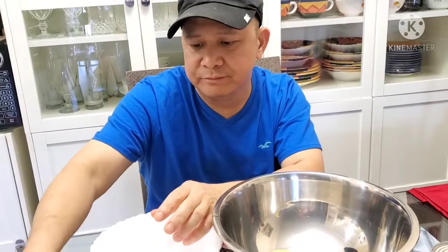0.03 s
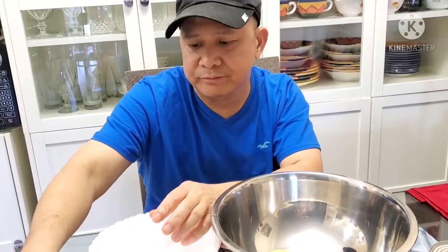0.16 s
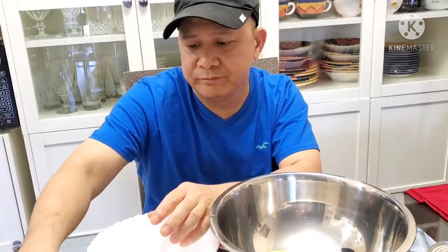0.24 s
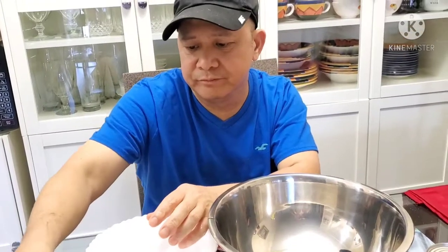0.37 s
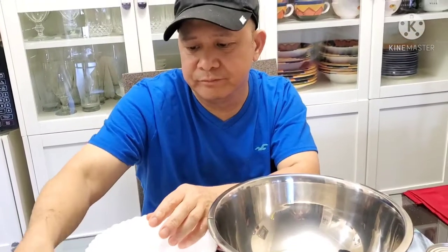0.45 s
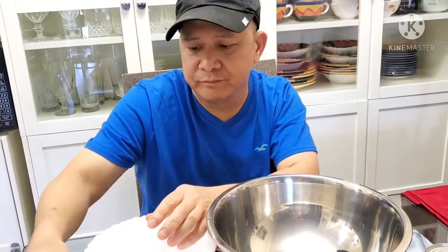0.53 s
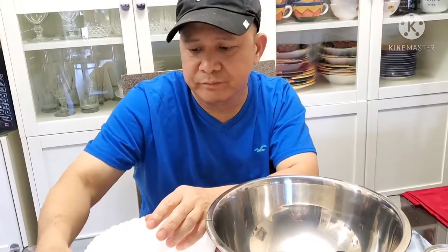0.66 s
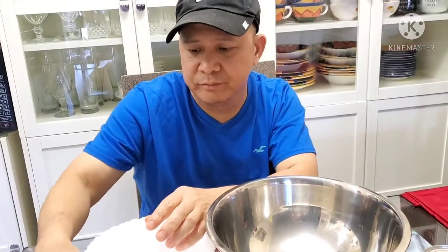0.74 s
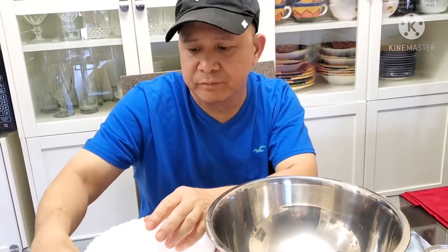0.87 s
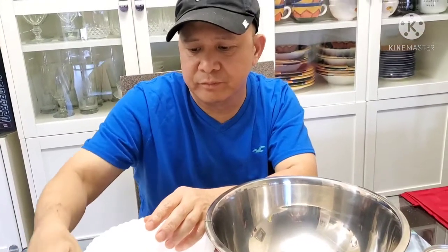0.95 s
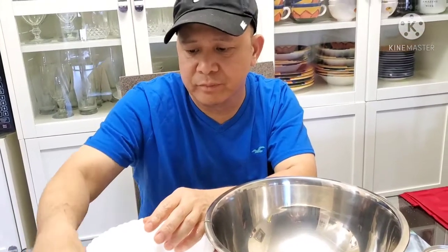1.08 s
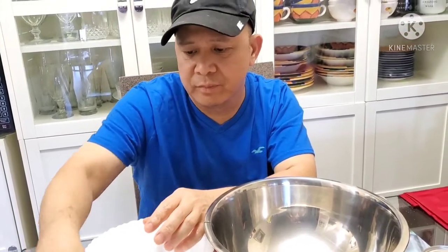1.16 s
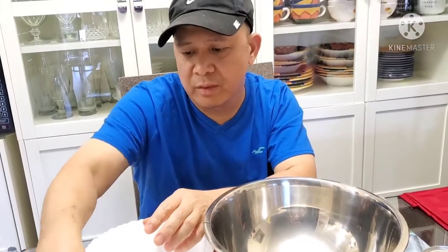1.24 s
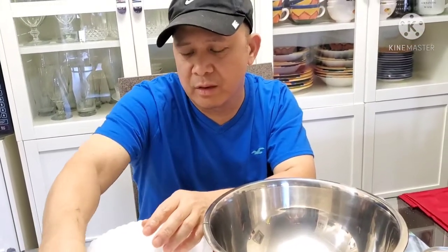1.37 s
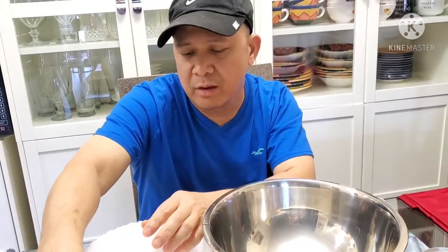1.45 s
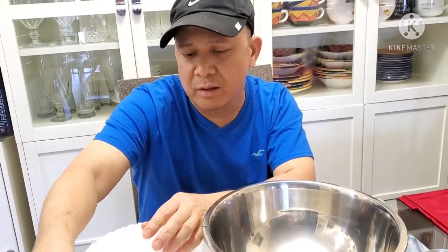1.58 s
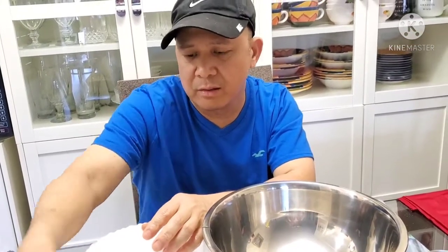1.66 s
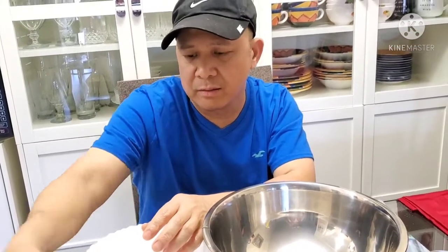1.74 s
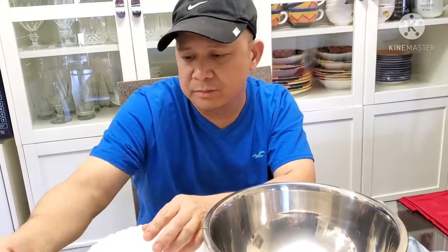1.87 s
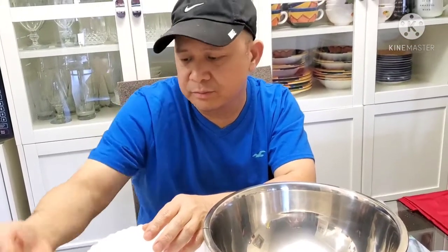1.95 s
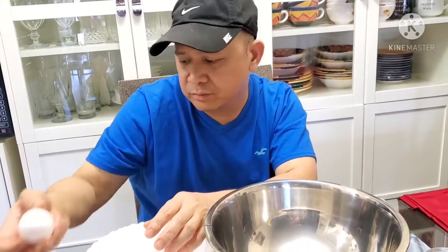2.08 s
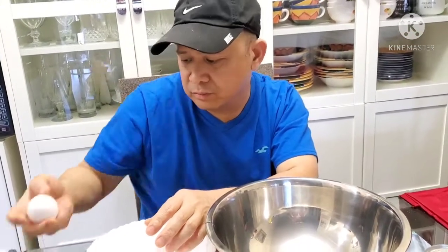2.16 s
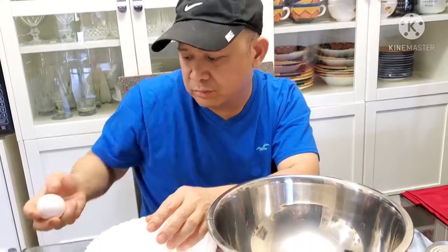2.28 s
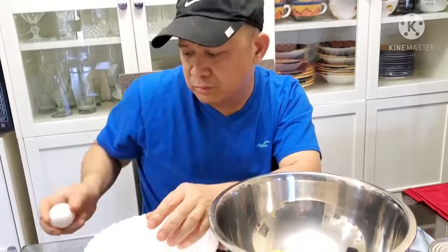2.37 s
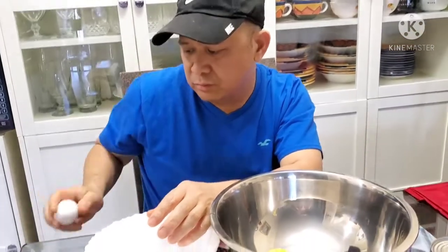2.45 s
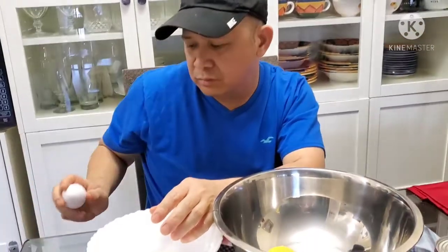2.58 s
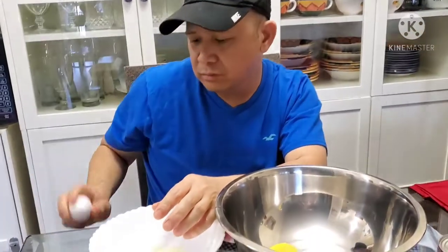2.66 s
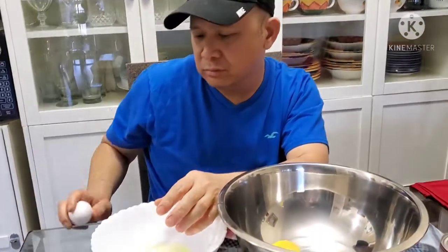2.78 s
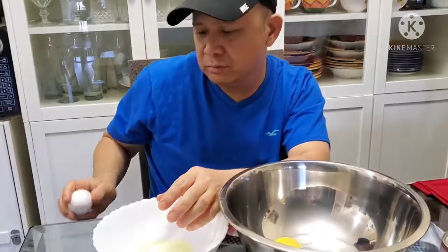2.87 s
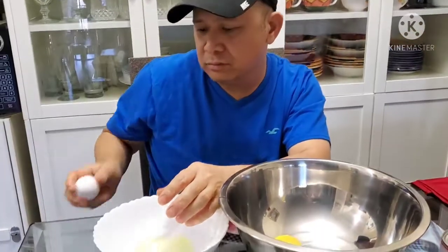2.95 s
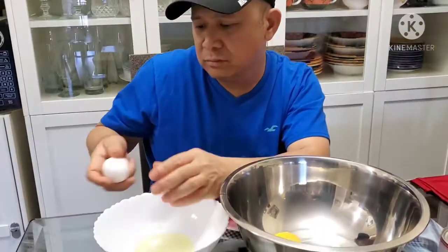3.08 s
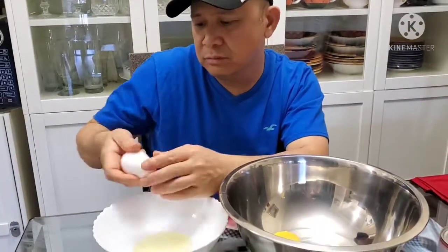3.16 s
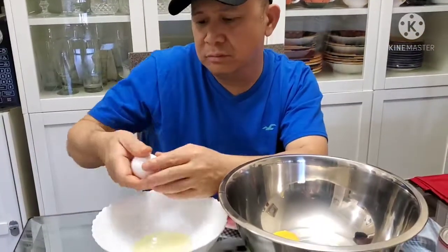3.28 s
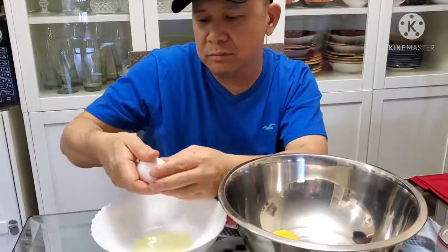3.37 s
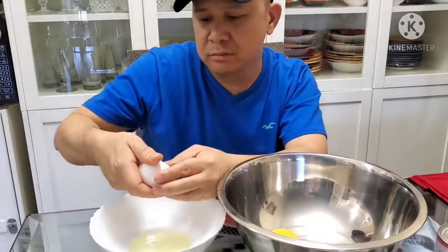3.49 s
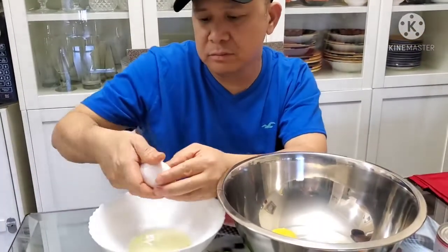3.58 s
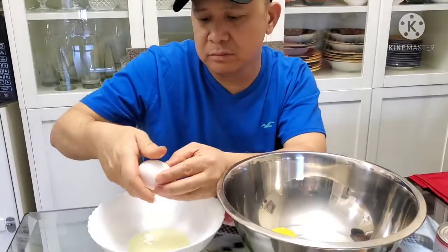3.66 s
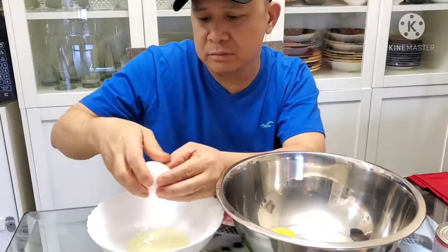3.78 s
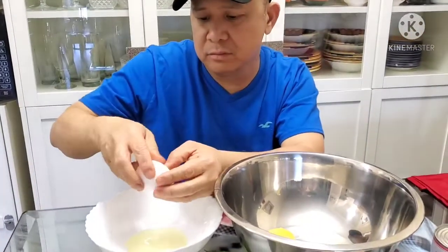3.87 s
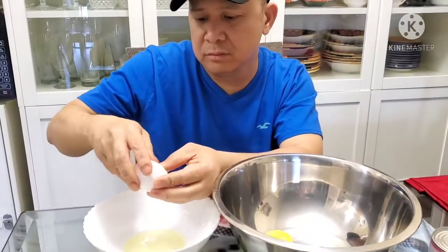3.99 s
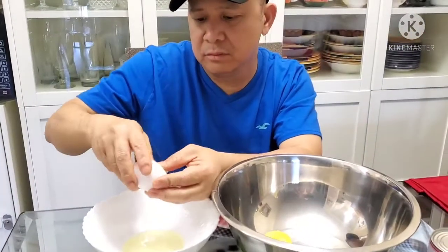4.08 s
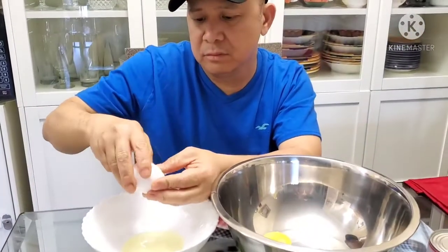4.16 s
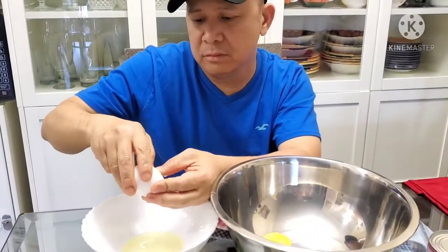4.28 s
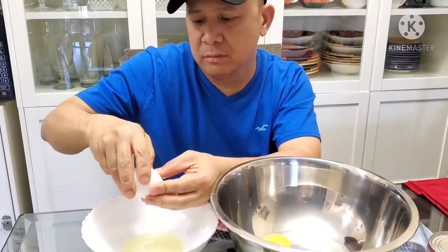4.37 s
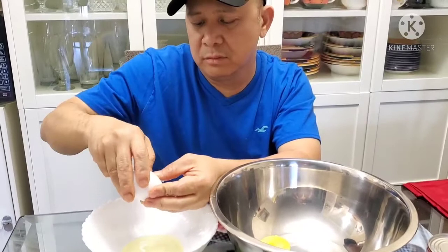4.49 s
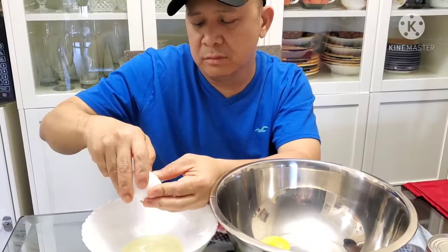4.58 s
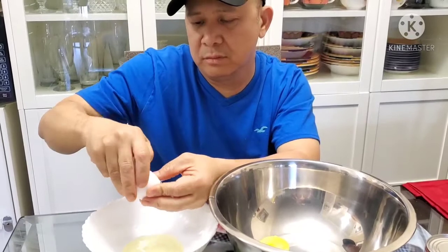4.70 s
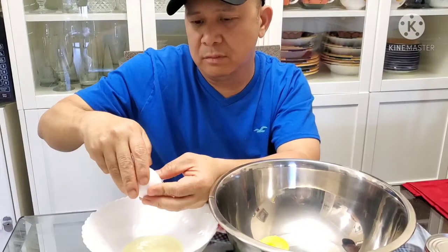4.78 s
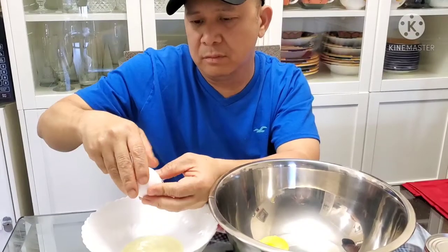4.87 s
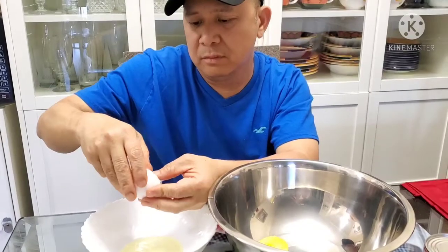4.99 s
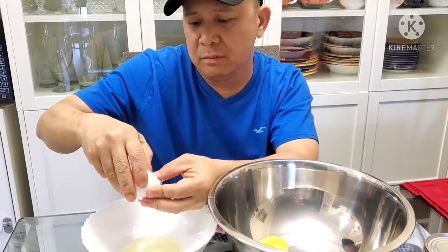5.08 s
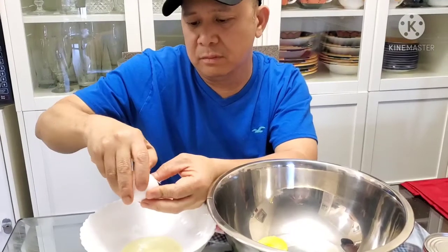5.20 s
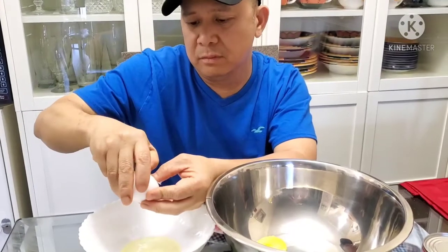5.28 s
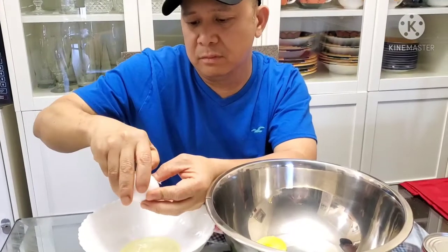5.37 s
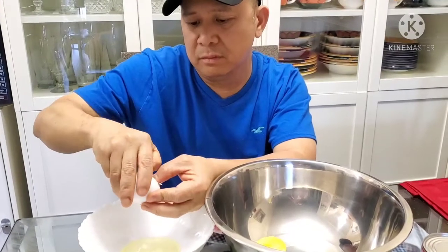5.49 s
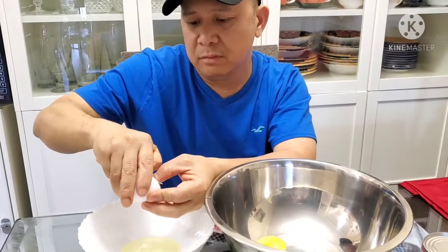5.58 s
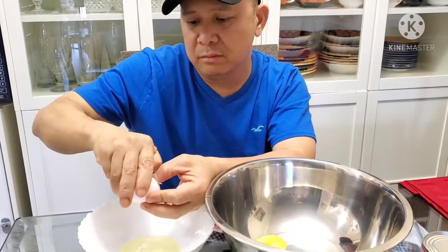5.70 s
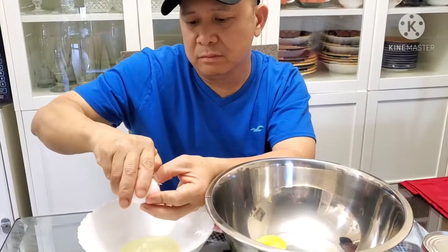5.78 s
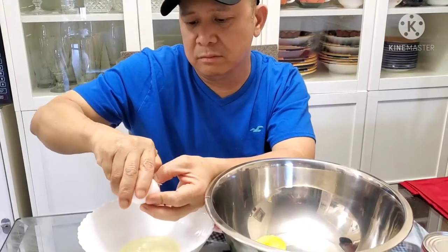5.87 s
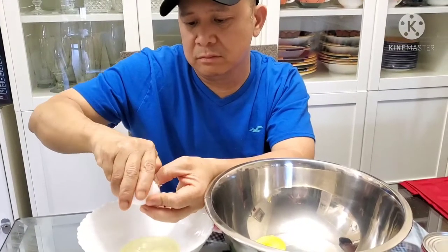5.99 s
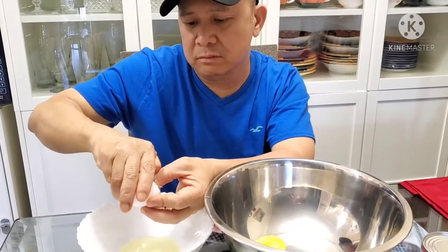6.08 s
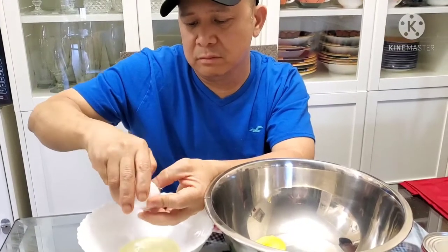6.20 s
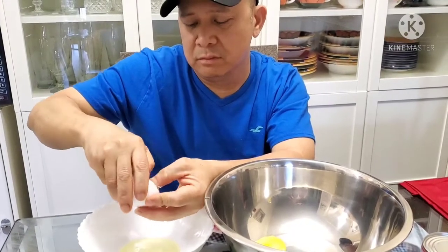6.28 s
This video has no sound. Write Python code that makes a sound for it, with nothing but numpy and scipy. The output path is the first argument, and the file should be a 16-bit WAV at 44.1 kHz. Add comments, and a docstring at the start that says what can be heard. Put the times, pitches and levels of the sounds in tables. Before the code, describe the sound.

Close handheld stereo capture in a reverberant kitchen: hollow papery rummaging and small taps come first, over a low fading engine drone and faint fridge hum. A single hard egg blow against a bowl dominates midway, ringing shortly in the room. Later the shell crackles crisply, a woody knock lands, and a weaker one closes. Birds chirp outside throughout, echoing through a window.

```python
"""A vehicle drones away outside and a fridge hums; a hand rummages in an egg carton while birds chirp.
The egg is knocked open on a bowl's edge, the shell crackles and two duller knocks follow on the table.
Drone, hum and birds are sines with shaken pitch; rubbing, road and air are shaped noise.
Blows are short cracks plus decaying modes. A hard-walled kitchen answers all but background and hiss.
Heard by a phone's two microphones."""
import sys
import numpy as np
from scipy import signal
from scipy.fft import rfft, irfft, next_fast_len
from scipy.io import wavfile
from scipy.ndimage import uniform_filter1d, map_coordinates

SR = 44100
rng = np.random.default_rng(int(sys.argv[2]) if len(sys.argv) > 2 else 0)


def output_pcm(signal):
    """Save a mono or channel-first signal as 16-bit PCM at the path in sys.argv[1].

    Samples are clipped to [-1, 1] before scaling.
    """
    pcm = np.clip(np.atleast_2d(signal).T, -1, 1) * 32767
    wavfile.write(sys.argv[1], SR, np.round(pcm).astype(np.int16))


N = 279594


def amp(db):
    """Gain of a level in dB."""
    return 10 ** (np.asarray(db) / 20)


def pan(db):
    """Left and right gains whose levels differ by db."""
    return amp(np.array([[.5], [-.5]]) * db)


def unit(x):
    """x at rms 1."""
    return x / np.sqrt(np.mean(x ** 2) + 1e-20)


def along(points, hz):
    """Interpolates (frequency [Hz], value) points on a log frequency axis."""
    f, v = np.transpose(points)
    return np.interp(np.log(hz + 1), np.log(f + 1), v)


def curves(rows):
    """One value per sample for each column after the time."""
    s, *cols = np.transpose(rows)
    return [np.interp(np.arange(N) / SR, s, c) for c in cols]


def wobble(rate_hz):
    """A smooth random curve with rate_hz knots a second."""
    knots = rng.standard_normal(int(N * rate_hz / SR) + 4)
    return map_coordinates(knots, [np.arange(N) * rate_hz / SR])


def filtered(x, response):
    """x shaped by a gain response of frequency, zero phase."""
    m = next_fast_len(x.shape[-1] + 8192)
    spectrum = rfft(x, m) * response(np.fft.rfftfreq(m, 1 / SR))
    return irfft(spectrum, m)[..., :x.shape[-1]]


def causal(points, size=4096):
    """Minimum-phase pulse of unit energy: the given spectrum, packed after its start."""
    hz = np.fft.rfftfreq(size, 1 / SR)
    cepstrum = irfft(np.log(amp(along(points, hz)) + 1e-6))
    cepstrum[1:size // 2] *= 2
    cepstrum[size // 2 + 1:] = 0
    pulse = irfft(np.exp(rfft(cepstrum)))
    return pulse / np.linalg.norm(pulse)


# left-right correlation of diffuse sound: (frequency [Hz], correlation [-1..1])
LIKENESS = [(60, 0.9), (130, 0.81), (290, .85), (640, .5), (1400, 0.024), (15000, .03)]


def rush(spectrum):
    """Stereo noise of rms 1, alike in the bass and unrelated in the treble."""
    def turn(hz):
        return np.arccos(np.clip(along(LIKENESS, hz), -1, 1)) / 2

    def mid_side(hz):
        return amp(along(spectrum, hz)) * [np.cos(turn(hz)), np.sin(turn(hz))]

    mid, side = filtered(rng.standard_normal((2, N)), mid_side)
    return unit(np.array([mid + side, mid - side]))


def add(out, x, s):
    """Mixes x into out from time s."""
    part = out[:, max(round(s * SR), 0):][:, :x.shape[1]]
    part += x[:, :part.shape[1]]


# reverberation of the hard-walled room: (frequency [Hz], t60 [s])
ROOM_T60 = [(100, 0.43), (500, .52), (1500, 0.55), (4000, 0.49), (10000, 0.56), (16000, 0.3)]


def kitchen(x, direct_db, early_db, early_t60):
    """Direct sound, a quick cluster of near reflections and a tail that decays per frequency."""
    size = SR * 4 // 7
    hz, t, z = signal.stft(rng.standard_normal((2, size)), SR, nperseg=256)
    decay = amp(-60 * t / along(ROOM_T60, hz)[:, None])
    tail = signal.istft(z * decay, SR, nperseg=256)[1][:, :size]
    t = np.arange(size) / SR
    early = amp(early_db - 60 * t / early_t60) * rng.standard_normal((2, size))
    mid, side = (tail + early) * (1 - np.exp(-t / 0.0021))

    def likeness(hz):
        return np.clip(along(LIKENESS, hz), -1, 1)

    mid = filtered(mid, lambda hz: np.sqrt(1 + likeness(hz)))
    side = filtered(side, lambda hz: np.sqrt(1 - likeness(hz)))
    answer = np.array([mid + side, mid - side])
    answer /= np.linalg.norm(answer[0])
    answer[:, 0] += amp(direct_db)
    return signal.fftconvolve(np.atleast_2d(x), answer, axes=1)


def blows(events, colour, modes, ring_db, direct_db, early_db, early_t60):
    """Each blow is one crack in the room, plus the decaying modes of the thing struck."""
    out, t = np.zeros((2, N)), np.arange(SR * 4 // 7) / SR
    onset = 1 - np.exp(-t / 0.0026)
    for s, db, pan_db in events:
        sound = kitchen(causal(colour), direct_db, early_db, early_t60)[:, :len(t)]
        for hz, level_db, t60 in modes:
            # phases differ between the sides where the sound is less alike
            spread = (1 - along(LIKENESS, hz)) * rng.normal(0, 1.2, (2, 1))
            phase = rng.uniform(0, 2 * np.pi) + spread
            ring = amp(ring_db + level_db - 60 * t / t60) * onset
            sound += ring * np.sin(2 * np.pi * hz * t + phase)
        add(out, amp(db) * pan(pan_db) * sound, s)
    return out


# vehicle drawing away, low tone fading in and out: (time [s], firing tone [Hz], mean level [dB])
DRONE = [(0, 53.34, -44.5), (.45, 52.63, -49.5), (.95, 53.28, -41.5), (1.45, 53.67, -44.5),
         (1.92, 54.23, -49.5), (2.21, 54.38, -56.5), (2.52, 55.3, -50), (2.75, 58.7, -51.5),
         (2.95, 58.47, -64.5), (3.11, 55.2, -53), (3.25, 52.14, -75.5), (3.45, 52.3, -56.5),
         (4.06, 50.5, -80.5), (4.4, 46.63, -61), (5.0, 49.94, -71), (5.6, 55, -76), (5.85, 55, -61.5),
         (6.04, 64, -79), (6.25, 61.2, -65)]
# firing tone and neighbours: (multiple of firing tone, relative level [dB])
ORDERS = [(.75, -21), (0.999, -0.5), (1.252, -19.5), (2.001, -24)]


def vehicle_drone():
    """An engine's firing tone and weak neighbours, wavering in pitch and level."""
    hz, level_db = curves(DRONE)
    turns = 2 * np.pi * np.cumsum(hz + 0.8 * wobble(8.6)) / SR
    level = np.sqrt(2) * amp(level_db + 2.2 * wobble(2.7))
    return level * sum(amp(db) * np.sin(k * turns) for k, db in ORDERS)


# fridge tones: (frequency [Hz], mean level [dB])
HUM = [(120, -70), (195, -80.5)]


def fridge_hum():
    """Sines, each wavering slightly in pitch and more in level."""
    hum = 0
    for hz, db in HUM:
        level = np.sqrt(2) * amp(db + 3.8 * wobble(5))
        hum = hum + level * np.sin(2 * np.pi * np.cumsum(hz + .4 * wobble(6)) / SR)
    return hum


# road rumble: (time [s], level [dB])
ROAD_LEVEL = [(0, -56), (.5, -60.5), (1, -57.5), (2.2, -62), (2.75, -61), (3.2, -66.5), (4.3, -62.5),
              (5.3, -63.5), (6.34, -62.5)]
# road rumble spectrum: (frequency [Hz], relative level [dB])
ROAD_COLOUR = [(15, -41.5), (25, -14), (38, -13), (59, -2), (72, -2.5), (82, -15.5), (123, -8.5),
               (143, -13.5), (266, -14), (388, -22), (648, -20.5), (706, -25), (1500, -50), (1950, -76.5),
               (3300, -120)]


def road_rumble():
    """Low noise whose level follows the traffic and flutters slightly."""
    level_db, = curves(ROAD_LEVEL)
    return amp(level_db + 0.19 * wobble(27)) * rush(ROAD_COLOUR)


# still air spectrum: (frequency [Hz], relative level [dB])
AIR_COLOUR = [(600, -28.5), (1000, -3), (1600, -4.5), (2800, -7), (4000, -9), (7000, -19.5), (10000, -11),
              (13000, -11.5), (16000, -16)]
AIR_DB = -81.5


def background():
    """Drone, hum and rumble lean to the right in level; still air is an even noise floor."""
    tones = vehicle_drone() + fridge_hum()
    return (tones + road_rumble()) * pan(-2.2) + amp(AIR_DB) * rush(AIR_COLOUR)


# ticks of shell and carton, and the sharp onset of the first table knock:
# (time [s], strength [dB], left-right [dB])
TICKS = [(0.0272, -56, 5), (0.0603, -53, 12), (0.3381, -62, -1.5), (0.5993, -63, 7), (0.6264, -47, -1.5),
         (1.1381, -67, 3), (1.659, -59, 7), (2.1146, -67, -4), (3.7272, -64, 1.5), (4.6339, -43, -7),
         (4.691, -37.5, -6), (4.6991, -44, 4), (4.807, -40, -1), (5.1696, -66, -3.5), (5.7697, -65.5, -4),
         (5.8442, -65.5, -8)]
# tick spectrum: (frequency [Hz], relative level [dB])
TICK_COLOUR = [(700, -43), (1500, -32), (4000, -18), (7000, -10.5), (10000, 0.5), (14000, -4.5),
               (16500, -9.5)]


def ticks():
    """Tiny decaying noise snaps, answered mostly by near reflections."""
    out, t = np.zeros((2, N)), np.arange(SR // 50) / SR
    for s, db, pan_db in TICKS:
        grain = rng.standard_normal(len(t)) * amp(-60 * t / 0.0096)
        snap = np.convolve(grain, causal(TICK_COLOUR))
        sound = kitchen(snap / np.abs(snap).max(), direct_db=0, early_db=16, early_t60=.08)
        add(out, amp(db) * pan(pan_db) * sound, s)
    return out


# finger strokes on carton and shell, drive levels before clumping:
# (time of full pressure [s], held [s], pulp body level [dB], dry hiss level [dB])
STROKES = [(0.058, .1, -75.5, -73.5), (0.258, 0.018, -71.5, -76), (.34, 0.0077, -86, -72),
           (0.613, 0.13, -63, -61.5), (0.799, 0.023, -63, -63.5), (.86, .01, -68.5, -78),
           (1.149, 0.015, -67.5, -71.5), (1.298, 0.076, -70, -72), (1.602, 0.038, -69, -74),
           (2.13, 0.011, -88, -76.5), (3.73, 0.073, -97, -78), (3.94, .01, -100, -84),
           (4.119, 0.13, -90, -85), (4.632, 0.0093, -81.5, -65), (4.689, .01, -74.5, -64),
           (5.18, 0.016, -98, -80.5), (5.77, 0.095, -96.5, -86)]
# pulp body spectrum: (frequency [Hz], relative level [dB])
PULP_COLOUR = [(250, -25), (500, -8), (800, 0), (1400, -4), (2200, -3), (3200, -10), (5000, -17),
               (7000, -26), (9000, -40)]
# dry hiss spectrum: (frequency [Hz], relative level [dB])
HISS_COLOUR = [(4000, -9), (6500, -33), (8000, -3.5), (10000, 3.5), (13000, -2.5), (15500, -3)]
PRESS_DB_PER_S, LIFT_DB_PER_S = 900, 246  # stroke swell and decay rates


def rubbing():
    """Clumped friction grains excite the pulp's body, which fills the room, and a dry hiss."""
    t = np.arange(N) / SR
    body_level, hiss_level = np.zeros((2, N))
    for s, held, body_db, hiss_db in STROKES:
        slope_db = np.maximum(PRESS_DB_PER_S * (s - t), LIFT_DB_PER_S * (t - s - held))
        drop_db = np.maximum(slope_db, 0)
        body_level += amp(body_db - drop_db)
        hiss_level += amp(hiss_db - drop_db)
    clumps = wobble(60)  # shared by body and hiss
    body = body_level * amp(2.33 * clumps + 0.5 * wobble(300)) * rush(PULP_COLOUR) * pan(-3)
    hiss = hiss_level * amp(1.5 * clumps + 0.83 * wobble(400)) * rush(HISS_COLOUR)
    return kitchen(body, direct_db=8, early_db=-3, early_t60=.08)[:, :N] + hiss


BUZZ_HZ = 200  # rms pitch shake at buzz share 1


def note(shape, hz, db):
    """A sine following a pitch and level outline, pitch shaken fast; returns start and samples."""
    s, share, level_db, buzz = np.transpose(shape)
    t = np.arange(s[0], s[-1], 1 / SR)
    shake = unit(uniform_filter1d(rng.standard_normal(len(t)), size=60))
    pitch = hz * np.interp(t, s, share) + BUZZ_HZ * np.interp(t, s, buzz) * shake
    level = amp(db + np.interp(t, s, level_db))
    return s[0], level * np.sin(2 * np.pi * np.cumsum(pitch) / SR)


# two-note chirps: (time [s], first note [Hz], second note [Hz], first level [dB], second level [dB])
CHIRPS = [(.115, 5105, 4404, -48, -50.5), (0.534, 5130, 4280, -49.5, -49.5),
          (0.901, 5265, 4306, -47.5, -46.5), (1.276, 5160, 4300, -45, -48), (1.677, 4972, 4240, -47, -56.5),
          (2.467, 5096, 4314, -49, -53.5), (3.644, 5030, 4347, -51, -49), (4.068, 4990, 4340, -50.5, -50),
          (4.57, 5020, 4290, -50, -52), (5.676, 5240, 4345, -51, -50), (6.029, 5084, 4154, -49.5, -49.5)]
# note outlines, hoarse in the glides, clearer on the held pitch:
# (time from chirp start [s], share of note pitch, relative level [dB], share of buzz)
LEAD_IN = [(-.045, 1.15, -31, 1.2), (-.02, 1.13, -22, 1.2), (.03, 1.16, -22, 1.2), (.07, 1.05, -28, 1.2)]
FIRST_NOTE = [(0, .71, -8, .8), (.005, .76, -1, 1), (.012, .95, -2, 1.2), (.017, 1, -4, .3),
              (.05, 1, -8, .3), (.062, .88, -8, 1.3), (.085, .76, -10, 1), (.095, .74, -25, .8)]
SECOND_NOTE = [(.1, .85, -16, 1), (.106, .88, -3, 1.2), (.116, 1, -2, .6), (.147, 1.0, -4, .6),
               (.165, .9, -5, 1.3), (.185, .83, -10, 1), (.195, .82, -25, .8)]
# second bird's hoarse falling calls:
# (time [s], length [s], start pitch [Hz], end pitch [Hz], level [dB], share of buzz)
FALLING_CALLS = [(0.451, 0.19, 4020, 3220, -58.5, 1.14), (1.708, 0.066, 3790, 2900, -60, 1.34),
                 (2.358, 0.19, 3990, 3126, -62, 1.32), (3.251, 0.15, 4025, 3050, -66.5, 1.1),
                 (6.005, .05, 3000, 2093, -51, 1.98)]


def birds():
    """Chirps and falling calls come in through a window, so mostly their echoes arrive."""
    calls = []
    for s, first_hz, second_hz, first_db, second_db in CHIRPS:
        notes = [(LEAD_IN, first_hz, first_db), (FIRST_NOTE, first_hz, first_db),
                 (SECOND_NOTE, second_hz, second_db)]
        calls.append((s, notes))
    for s, length, start_hz, end_hz, db, buzz in FALLING_CALLS:
        quarter_hz = (3 * start_hz + end_hz) / 4
        glide = [(0, start_hz, -10, buzz), (length / 4, quarter_hz, 0, buzz),
                 (length, end_hz, -4, buzz), (length + .01, end_hz, -30, buzz)]
        calls.append((s, [(glide, 1, db)]))  # pitch already in Hz
    out = np.zeros((2, N))
    for s, notes in calls:
        voice = np.zeros((1, SR // 3))
        first = notes[0][0][0][0]  # earliest point of the first outline
        for shape, hz, db in notes:
            start, samples = note(shape, hz, db)
            add(voice, samples[None], start - first)
        add(out, kitchen(voice, direct_db=-18, early_db=-8, early_t60=.15), s + first)
    return out * pan(-1.4)


# hollow taps and scrapes on the carton: (time [s], strength [dB], left-right [dB], strongest [Hz])
TAPS = [(.075, -32, 1, 860), (0.258, -31.5, -1, 776), (.339, -31, -4, 780), (.61, -25, 2, 850),
        (.618, -28.5, -9, 1430), (.71, -28, 5, 795), (.795, -26, 3, 860), (0.81, -32, -7, 2094),
        (.825, -31, 3, 894), (.835, -36, 4, 1000), (.857, -32, -3, 830), (.871, -22.5, 0.5, 1020),
        (1.142, -43.5, -12, 1194), (1.159, -36, -11, 2060), (1.255, -37.5, -9, 2100),
        (1.31, -42, -13, 1720), (1.344, -30.5, -11, 1900), (1.404, -32, -5, 1920), (1.56, -36.5, 0, 776),
        (1.578, -40.5, -10, 1777), (1.608, -38, -12, 2370), (1.63, -38, -3, 2200), (1.664, -41, -7, 2140)]
# tap spectrum: (multiple of strongest frequency, relative level [dB])
TAP_COLOUR = [(.3, -30), (.75, -12), (1.0, 0), (1.3, -12), (2.5, -24), (20, -42)]
# carton modes: (frequency [Hz], relative level [dB], t60 [s])
CARTON_MODES = [(798, 8, 0.15), (990, 1, 0.088), (1450, -2, 0.02), (2210, -14, 0.025), (2900, -8, 0.024)]


def taps():
    """Each tap favours the band of the cell that it hits; the carton's modes ring briefly."""
    out = np.zeros((2, N))
    for s, db, pan_db, strongest_hz in TAPS:
        colour = [(k * strongest_hz, level_db) for k, level_db in TAP_COLOUR]
        out += blows([(s, db, pan_db)], colour, CARTON_MODES,
                     ring_db=-42, direct_db=-6.0, early_db=14.0, early_t60=0.079)
    return out


# blow on the bowl's edge: (time [s], strength [dB], left-right [dB])
EGG = [(2.7168, 16.5, -1)]
# crack spectrum: (frequency [Hz], relative level [dB])
EGG_COLOUR = [(35, -41), (60, -14), (140, -7), (200, -16), (310, -12), (389, -18), (636, -23), (750, -7.5),
              (1100, -5.5), (1500, -2.5), (2140, -7.5), (3900, -12.5), (4400, -24.5), (7000, -35.5),
              (10500, -33), (16500, -43)]
# bowl modes: (frequency [Hz], relative level [dB], t60 [s])
BOWL_MODES = [(126, -9, .3), (380, -13, .25), (575, -13, .3), (753, -4, .38), (871, -4, .5),
              (1043, -2, .42), (1084, 0, .36), (1234, -5, .25), (1354, 0, .25), (1518, -1, .25),
              (1696, -5, .25), (2100, -6, .35), (2635, -4, .18), (3560, 6, .06)]


def egg_crack():
    """The egg's blow is a bright crack that rings the bowl's modes."""
    return blows(EGG, EGG_COLOUR, BOWL_MODES,
                 ring_db=-38.5, direct_db=-17.0, early_db=12, early_t60=.1)


# duller knocks on the table: (time [s], strength [dB], left-right [dB])
KNOCKS = [(4.806, 3.5, -1), (6.242, -12, 0)]
# knock spectrum: (frequency [Hz], relative level [dB])
KNOCK_COLOUR = [(60, -67), (100, -29), (250, -13), (400, -9.5), (600, -10), (900, -3), (1700, -4),
                (2500, -10), (3500, -16.5), (4700, -40.5), (7000, -44.5), (9500, -48), (13000, -68),
                (16500, -51)]
# table modes: (frequency [Hz], relative level [dB], t60 [s])
TABLE_MODES = [(135, -10, .3), (245, -7, .3), (575, -5, .3), (800, -2, .25), (1280, -3, .22),
               (1505, -3, .22), (1770, 0, .2), (2475, -5, .2)]


def table_knocks():
    """Knocks with less treble that ring the table's modes."""
    return blows(KNOCKS, KNOCK_COLOUR, TABLE_MODES,
                 ring_db=-34.5, direct_db=-14.5, early_db=5.0, early_t60=0.25)


# phone's body between its ports: (frequency [Hz], left-right [dB])
SHADOW = [(200, -1), (700, -1), (2000, -5), (4400, 1), (8000, -2), (13000, 8.5)]


def body_shadow(x):
    """The phone's body tilts the left-right balance with frequency."""
    return filtered(x, lambda hz: pan(along(SHADOW, hz)))


def scene():
    """Everything at the two microphones; the background arrives 9 samples earlier on the left."""
    struck = body_shadow(egg_crack() + table_knocks())
    left, right = background()
    ambience = np.array([left, np.roll(right, 9)])
    return ambience + ticks() + rubbing() + birds() + taps() + struck


def record(dry):
    """The phone's response drops 22 dB near the top and keeps nothing above its band limit."""
    shelf_hz, top_hz = 15500, 16650
    return filtered(dry, lambda hz: amp(-22 * (hz > shelf_hz)) * (hz < top_hz))


dry = scene()
out = record(dry)
output_pcm(out)
```